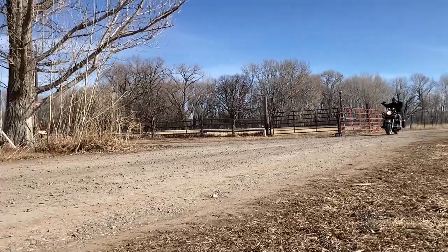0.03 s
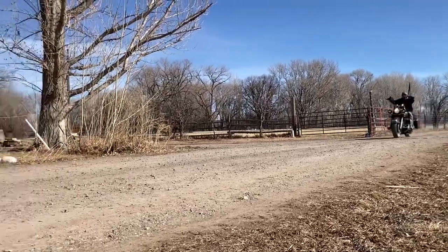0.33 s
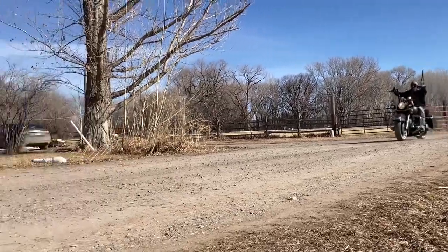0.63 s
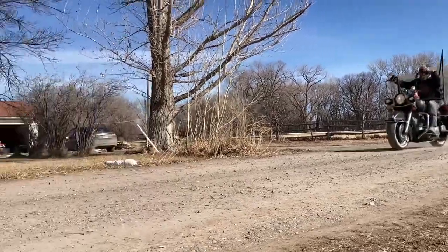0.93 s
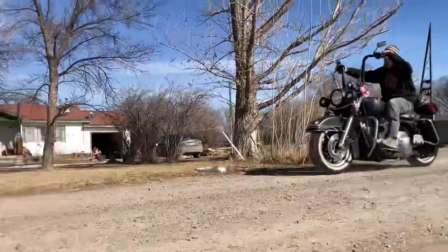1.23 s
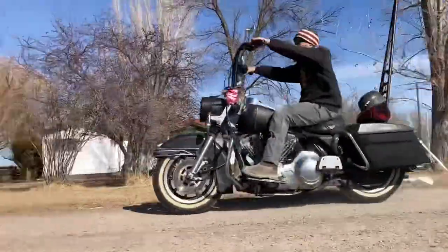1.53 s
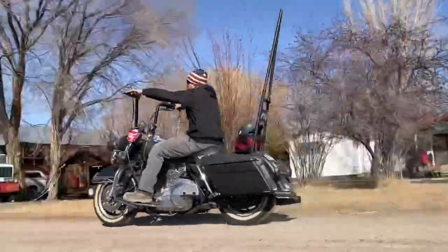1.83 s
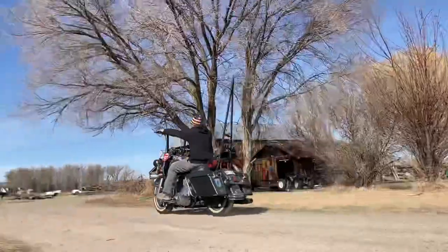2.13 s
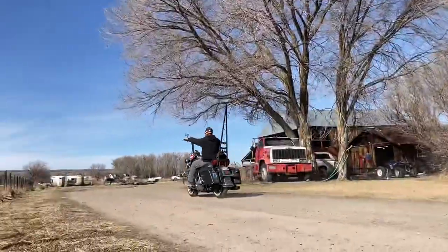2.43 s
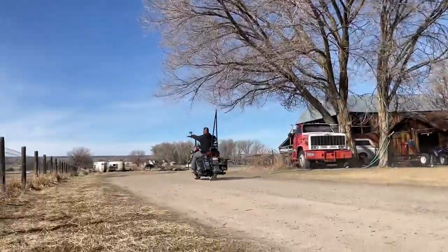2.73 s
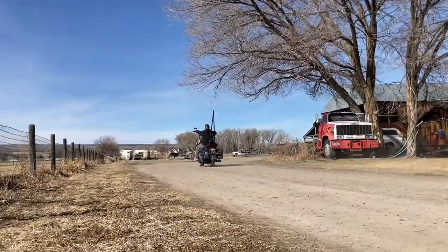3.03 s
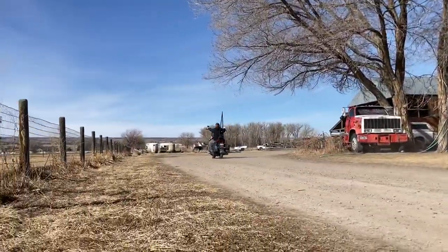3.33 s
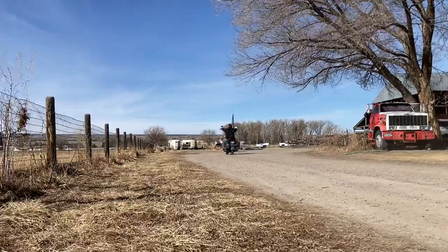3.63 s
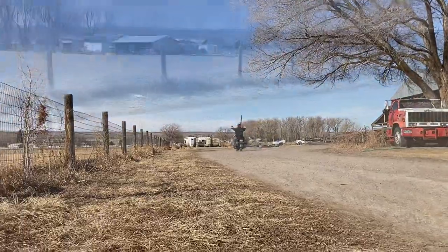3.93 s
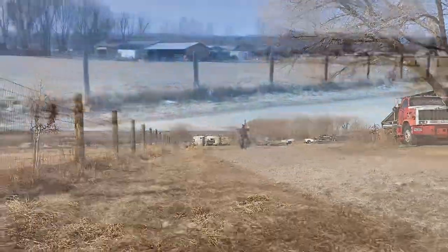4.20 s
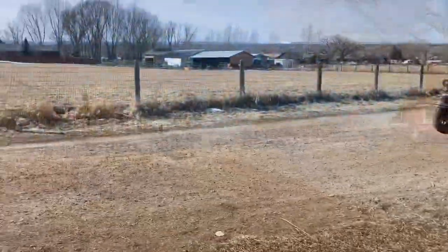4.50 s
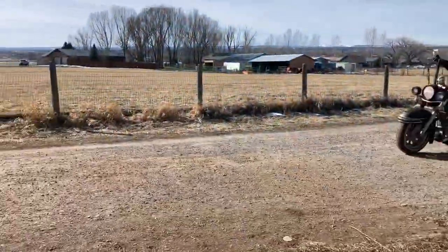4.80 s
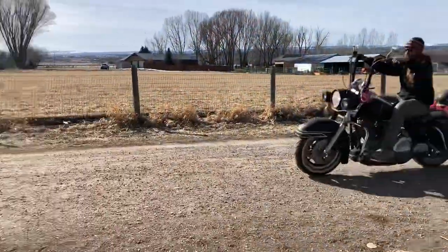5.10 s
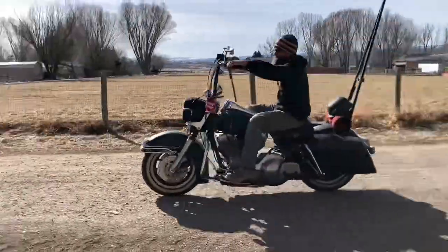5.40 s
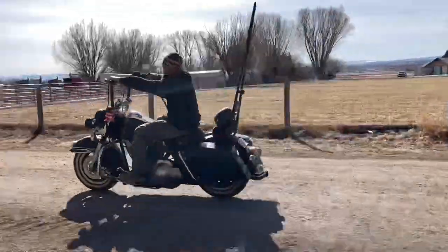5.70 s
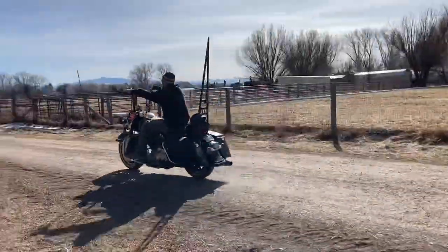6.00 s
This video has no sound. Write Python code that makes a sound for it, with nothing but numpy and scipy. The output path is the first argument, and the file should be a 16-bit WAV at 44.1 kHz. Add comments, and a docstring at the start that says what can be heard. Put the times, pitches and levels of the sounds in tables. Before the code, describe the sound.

A deep, rumbling motorcycle passes close by on crunching gravel, fades with exhaust pops, then accelerates past again and slows to a chug.

```python
"""A big V-twin motorcycle rides past twice on a gravel drive, close by, over a low outdoor rumble.
It approaches with firing pulses ringing its pipes, while the tyres grind and flick stones.
The throttle shuts at 1.2 s; it passes and coasts away booming, unburnt fuel popping in the pipe,
until one cylinder thuds near idle. From 4.1 s the second pass fades in: the engine speeds up,
shuts off at 5.6 s and drops to a slow chug that cracks at each firing."""
import sys
import numpy as np
from scipy import signal
from scipy.fft import rfft, irfft, next_fast_len
from scipy.io import wavfile

SR = 44100
rng = np.random.default_rng(int(sys.argv[2]) if len(sys.argv) > 2 else 0)


def pcm_store(signal):
    """Save signal as 16-bit PCM."""
    levels = np.round(np.clip(np.atleast_2d(signal), -1, 1) * 32767)
    wavfile.write(sys.argv[1], SR, levels.astype(np.int16).T)


N = 271215
T = np.arange(N) / SR
FIRST_PASS_S, SECOND_PASS_S = 1.634, 5.323  # moments of closest approach
ROAD_M_PER_S, CLOSEST_M = 6.15, 2.384


def amp(db):
    """Decibels to amplitude ratio; all levels here are relative."""
    return 10 ** (np.asarray(db) / 20)

def unit_rms(x):
    """Normalisation to rms 1."""
    return x / np.sqrt(np.mean(x ** 2) + 1e-20)

def curves(rows):
    """Linear interpolation in time of each column after the first."""
    times, *columns = np.transpose(rows)
    return [np.interp(T, times, column) for column in columns]

def add(mix, s, sound):
    """Superposition of a sound starting at time s."""
    part = mix[max(round(s * SR), 0):][:len(sound)]
    part += sound[:len(part)]

def below(x, hz, order=4):
    """Zero-phase low-pass."""
    return signal.sosfiltfilt(signal.butter(order, hz, fs=SR, output="sos"), x)

def impulse_response(tone, size=8192):
    """Minimum phase: the Hilbert transform of the log spectrum gives a causal response."""
    hz, db = np.transpose(tone)
    log_hz = np.log(abs(np.fft.fftfreq(size, 1 / SR)) + 1)
    log_gain = np.log(amp(np.interp(log_hz, np.log(hz), db, left=db[0] - 5.5, right=db[-1])))
    return np.fft.ifft(np.exp(np.conj(signal.hilbert(log_gain)))).real[:size // 2]

def coloured(x, tone):
    """Source and filter: x excites a body with the given spectrum."""
    return signal.oaconvolve(x, impulse_response(tone))[:N]

def resonances(x, modes):
    """Forced vibration: x drives parallel resonators."""
    return sum(amp(db) * unit_rms(signal.lfilter(*signal.iirpeak(hz, hz / width, fs=SR), x))
               for hz, width, db in modes)

def puffs(clicks, decay_s, steady):
    """Turbulence flares at each click and decays exponentially, over a steady flow."""
    flare = signal.lfilter([1], [1, -np.exp(-1 / (decay_s * SR))], clicks)
    return unit_rms((unit_rms(flare) + steady) * rng.standard_normal(N))

def place(pass_s):
    """Uniform straight motion: distance/m and direction cosine (-1 coming, 1 going)."""
    along = ROAD_M_PER_S * (T - pass_s)
    distance = np.hypot(CLOSEST_M, along)
    return distance, along / distance

def carried(pass_s, db, per_doubling, per_m, behind):
    """Level/dB after spreading and ground losses (negative ones are gains) and rear directivity."""
    distance, away = place(pass_s)
    loss_db = per_doubling * np.log2(distance / CLOSEST_M) + per_m * (distance - CLOSEST_M)
    return db - loss_db + behind * away

def crossfade():
    """Equal-power gains of the first and second pass."""
    second = np.interp(T, (4.1, 4.45), (0, 1))
    return np.sqrt(1 - second), np.sqrt(second)

def firings(speed, at_s, phase, rear_db, gap, uneven_db, jitter_s):
    """Uneven pulse train of a V-twin: the rear cylinder fires gap cycles after the front."""
    turns = np.cumsum(speed) / SR
    turns += phase - np.interp(at_s, T, turns)
    cycles, clicks = np.arange(np.floor(turns[0]), turns[-1]), np.zeros(N)
    scatter = np.clip(rng.standard_normal((len(cycles), 2, 2)), -1.7, 1.7)
    for cylinder, (lag, db) in enumerate([(0, 0), (gap, rear_db)]):
        due_s = np.interp(cycles + lag, turns, T, left=-np.inf, right=np.inf)
        at = (due_s + jitter_s * scatter[:, cylinder, 0]) * SR
        inside = (at >= 0) & (at < N)
        clicks[at[inside].astype(int)] += amp(db + uneven_db * scatter[:, cylinder, 1])[inside]
    return clicks

def cycle_clicks(speed, at_s):
    """Impulse train at the cycle rate, with one impulse at at_s."""
    turns = np.cumsum(speed) / SR
    whole = np.floor(turns - np.interp(at_s, T, turns))
    return np.diff(whole, prepend=whole[0])

def pipe_echo(x, trip_s, bounce):
    """All-pass reflection: a pulse bounces between the pipe ends and leaves in instalments."""
    size = next_fast_len(N + SR // 2)
    trip = np.exp(-2j * np.pi * np.fft.rfftfreq(size, 1 / SR) * trip_s)
    return irfft(rfft(x, size) * (trip - bounce) / (1 - bounce * trip), size)[:N]

def exhaust(clicks, tone, boom_db, bark_db, fade_in, fade_out, rough, trip_s, bounce, boom_hz=170):
    """Pipe resonance driven by pulses and turbulence, split into low boom and higher bark."""
    drive = unit_rms(clicks) + rough * puffs(clicks, decay_s=.51, steady=.35)
    pipe = pipe_echo(below(coloured(drive, tone), hz=2420), trip_s, bounce)
    boom = below(pipe, boom_hz)
    fade = np.sqrt(np.interp(T, fade_in, [0, 1]) * np.interp(T, fade_out, [1, 0]))
    return fade * (amp(boom_db) * unit_rms(boom) + amp(bark_db) * unit_rms(pipe - boom))


def first_speed(cruise_hz=24.218, coast_hz=23.274, idle_hz=11.009, shut_s=1.18):
    """Four-stroke cycles per s: a slow rise, a drop at shut-off, then exponential decay to idle."""
    run_down = np.exp(-np.maximum(T - 1.41, 0) / 3.614)
    return np.where(T < shut_s, cruise_hz + .303 * T, idle_hz + (coast_hz - idle_hz) * run_down)

# Spectrum of an exhaust pulse at light throttle: f/Hz, level/dB
CRUISE_TONE = [(25, -24), (73, -3), (100, 8), (135, 4.5), (175, -2), (220, -3), (245, -10), (290, -8),
               (318, 3.5), (342, -1.5), (368, -8.5), (392, -16), (415, -29), (440, -7.5), (465, -19.5),
               (512, -32), (548, -12.5), (585, -32), (1050, -36), (2000, -74)]
def cruise(clicks):
    """Periodic excitation: steady firing sounds the pipes in a harmonic series."""
    boom_db = carried(FIRST_PASS_S, -9, per_doubling=-4, per_m=1.53, behind=5)
    bark_db = carried(FIRST_PASS_S, -5.5, per_doubling=4, per_m=0, behind=1.5)
    return exhaust(clicks, CRUISE_TONE, boom_db, bark_db, fade_in=(-1, 0), fade_out=(1.17, 1.195),
                   rough=.2, trip_s=.0038, bounce=.8)

# Spectrum of gas noise at the pipe mouths: f/Hz, level/dB
FIRST_RASP_TONE = [(300, 14.5), (600, 1.5), (1100, -0.5), (1600, -6), (2200, -12), (3200, -18),
                   (5000, -18.5), (9000, -27), (16000, -30)]
def first_rasp(speed):
    """Directivity: the gas noise pulses more deeply as the pipe mouths turn towards us."""
    spits = firings(speed, 0, phase=-.68, rear_db=4.5, gap=.42, uneven_db=1.7, jitter_s=.001)
    facing = np.interp(T, (1.2, 2.1), (.3, 1))
    hiss = puffs(spits * facing, decay_s=.013, steady=1)
    level_db = carried(FIRST_PASS_S, -13, per_doubling=4, per_m=1.38, behind=-1)
    return amp(level_db) * unit_rms(coloured(hiss, FIRST_RASP_TONE)) * crossfade()[0]

# Modes of chain and valve gear: f/Hz, bandwidth/Hz, level/dB
CLATTER_MODES = [(2815, 80, -4), (3750, 300, -3), (4575, 30, -12), (4802, 16, -7.5), (5150, 260, -5),
                 (5722, 16, -15), (6272, 16, -14), (8505, 16, -21), (9184, 24, -18)]
def clatter(clicks):
    """Forced vibration: chain and valve gear rattle at each firing, audible only close by."""
    taps = puffs(clicks, decay_s=.006, steady=.7)
    level_db = carried(FIRST_PASS_S, -31.5, per_doubling=19, per_m=.5, behind=2)
    return amp(level_db) * unit_rms(resonances(taps, CLATTER_MODES))

def pebbles(count=700, low_hz=2800, high_hz=13000, decay_s=.002, spread_db=12):
    """Damped resonance: colliding pebbles tick, each at its own pitch."""
    out, t = np.zeros(N), np.arange(SR // 50) / SR
    for when, pitch, size in rng.random((count, 3)):
        hz = low_hz * (high_hz / low_hz) ** pitch
        burst = rng.standard_normal(len(t)) * np.exp(-t / decay_s)
        tick = signal.lfilter(*signal.iirpeak(hz, Q=4, fs=SR), burst)
        add(out, when * N / SR, amp(spread_db * size ** 2) * unit_rms(tick))
    return unit_rms(out)

# Spectrum of grinding gravel: f/Hz, level/dB
GRAVEL_TONE = [(800, -25.5), (2200, 9.5), (4200, 1.5), (5200, -8.5), (7000, -1), (9200, -6), (10100, -1.5),
               (11200, -4.5), (12800, -11), (14000, -8), (16000, -2.5)]
# Mudguard modes: f/Hz, bandwidth/Hz, level/dB
MUDGUARD_MODES = [(3450, 50, -25), (4113, 100, -17), (4900, 200, -25), (5276, 70, -24), (7710, 90, -24),
                  (9050, 80, -25), (10100, 130, -22), (10700, 110, -26), (12800, 150, -24)]
# Patches of loose gravel: t/s, gain/dB, half-length/s
LOOSE_PATCHES = [(1.652, 3.5, 0.057), (3.067, 10, 0.21), (3.5, 9, 0.24), (5.5, 2.5, 0.042)]
def tyres(grains_per_s=550, spread_db=2, air_db_per_m=.4):
    """Shot noise: countless stones grind under the tyres and ring the mudguards."""
    sizes = amp(spread_db * np.minimum(rng.exponential(1, N), 5)) * rng.choice([-1, 1], N)
    grains = sizes * (rng.random(N) < grains_per_s / SR)
    grit = unit_rms(grains) + .45 * puffs(abs(grains), decay_s=.007, steady=.064)
    crunch = unit_rms(coloured(grit, GRAVEL_TONE)) + .4 * pebbles()
    mudguards = resonances(grit, MUDGUARD_MODES)
    dull = below(crunch, hz=6000, order=2)
    loose_db = sum(db * np.exp(-((T - s) / length) ** 2) for s, db, length in LOOSE_PATCHES)
    levels = (carried(FIRST_PASS_S, -29, per_doubling=3, per_m=2.04, behind=-3.5),
              carried(SECOND_PASS_S, -49, per_doubling=5, per_m=3, behind=4))
    out = np.zeros(N)
    for pass_s, level_db, fade in zip((FIRST_PASS_S, SECOND_PASS_S), levels, crossfade()):
        distance, away = place(pass_s)
        treble = crunch - dull + (.6 - .42 * away) * mudguards
        treble *= amp(-3.5 - air_db_per_m * distance)  # absorption by air and grass
        out += fade * amp(level_db + loose_db) * (dull + treble)
    return out

# Spectrum of the outdoor rumble: f/Hz, level/dB
RUMBLE_TONE = [(20, -19.5), (60, 2), (200, 6.5), (1000, -31), (4000, -47.5), (9000, -50.5), (16000, -64)]
def low_rumble():
    """Stationary noise: a steady low outdoor rumble, strongest near 200 Hz."""
    return amp(-29) * unit_rms(coloured(rng.standard_normal(N), RUMBLE_TONE))

def strikes(rows, decay_s, noisy, reach):
    """Damped impacts: a trace of pitch in a noise band that extends to reach times that pitch."""
    out, t = np.zeros(N), np.arange(SR // 20) / SR
    for s, db, hz in rows:
        band = signal.butter(2, [hz / 1.5, min(hz * reach, SR * .45)], "band", fs=SR, output="sos")
        crack = unit_rms(signal.sosfilt(band, rng.standard_normal(len(t))))
        blow = (np.sin(2 * np.pi * hz * t) + noisy * crack) * np.exp(-t / decay_s)
        add(out, s, amp(db) * blow / abs(blow).max())
    return out

# Knocks and crackles from the bike: t/s, peak level/dB, f/Hz
KNOCKS = [(.399, -19, 1020), (1.281, -13, 1100), (1.45, -11, 1200), (1.476, -11, 1250), (1.602, -8, 1300),
          (1.626, -9, 1500), (1.672, -7.5, 1400), (1.737, -8.5, 1100), (1.782, -10, 1200),
          (1.852, -12, 1200), (1.879, -13, 1100), (1.939, -10, 1300), (1.988, -13, 1100), (2.08, -14, 1600),
          (2.137, -17.5, 1500), (2.225, -16, 1100), (2.274, -17.5, 1400), (2.321, -16.5, 1600),
          (2.422, -20, 1600), (2.473, -17.5, 1500), (2.531, -19, 1200), (2.571, -23, 1800),
          (2.623, -22.5, 1600), (2.723, -24, 1800), (2.826, -19.5, 1850), (5.703, -27.5, 1400),
          (5.839, -32, 1700)]
def knocks():
    """Heavy damping: each knock dies within a few periods."""
    return strikes(KNOCKS, decay_s=.0075, noisy=1.7, reach=1.5)

# The largest stones flicked by the tyres: t/s, peak level/dB, f/Hz
STONES = [(.44, -31, 9000), (.672, -25, 10000), (.8199, -21.5, 4140), (.9408, -33, 6500),
          (1.055, -13, 3400), (1.5145, -13, 3030), (1.603, -15, 2750), (1.6223, -21, 4340),
          (1.6682, -32, 3840), (1.691, -10.5, 3480), (1.8293, -16, 6860), (2.11, -13, 5900),
          (2.2498, -17, 6440), (2.7012, -24, 3250), (2.9092, -29, 3720), (2.984, -25.5, 3550),
          (3.012, -41, 9100), (3.06, -28, 10000), (3.38, -45, 8000), (4.9427, -35.5, 4430),
          (5.1937, -33, 4960), (5.3503, -37.5, 5030), (5.4819, -35, 4500), (5.5095, -43, 5000)]
def stones():
    """Brief impacts have broad spectra: flicked stones snap with little pitch."""
    return strikes(STONES, decay_s=.0035, noisy=4, reach=4)

# Stones hitting the frame: t/s, peak level/dB
CLINKS = [(1.937, -9), (1.056, -15)]
# Frame modes: f/Hz, level/dB, T60/s
FRAME_MODES = [(3311, -7, .07), (6175, 0, .06), (7919, -3, .046), (9884, -6, .05), (12770, -4, .045),
               (14900, -8, .045)]
def clinks():
    """Free vibration: the steel frame rings in inharmonic modes after a stone strikes it."""
    out, t = np.zeros(N), np.arange(SR // 8) / SR
    steel = sum(amp(db - 60 * t / t60) * np.sin(2 * np.pi * hz * t) for hz, db, t60 in FRAME_MODES)
    steel += 1.1 * rng.standard_normal(len(t)) * np.exp(-t / .012)  # contact noise
    for s, db in CLINKS:
        add(out, s, amp(db) * steel / abs(steel).max())
    return out

# Spectrum of an exhaust pulse while coasting: f/Hz, level/dB
COAST_TONE = [(25, -99), (50, -6.5), (68, 6), (95, 2.5), (125, -3.5), (160, -2.5), (210, -2.5), (305, -3),
              (355, -19), (410, -6), (460, -17.5), (600, -16), (900, -45), (2000, -92.5)]
def coast(speed, ground_hz=270, ground_db_per_m=.7):
    """Ground absorption: the lumpy closed-throttle boom loses its upper part with distance."""
    clicks = firings(speed, 0, phase=-.74, rear_db=0, gap=.43, uneven_db=.8, jitter_s=.00014)
    boom_db = carried(FIRST_PASS_S, -8.3, per_doubling=-1.5, per_m=1.25, behind=0)
    bark_db = carried(FIRST_PASS_S, -17, per_doubling=-1, per_m=1.07, behind=4.5)
    pipe = exhaust(clicks, COAST_TONE, boom_db, bark_db, fade_in=(1.175, 1.2), fade_out=(3.9, 4.42),
                   rough=.1, trip_s=.006, bounce=.75, boom_hz=142)
    low = below(pipe, ground_hz)
    distance, _ = place(FIRST_PASS_S)
    return low + (pipe - low) * amp(-ground_db_per_m * (distance - CLOSEST_M))

# Unburnt fuel firing in the pipe: t/s, level/dB
POPS = [(1.356, 6.5), (1.513, 6), (1.644, 6.5), (1.707, 6.5), (1.748, 1), (1.851, 4), (1.886, 6.5),
        (1.961, 3.5), (2.028, 6), (2.17, 4.5), (2.206, -2), (2.366, 1.5), (2.508, -7), (2.549, -4),
        (2.651, -8), (2.672, -7), (2.748, -6), (2.853, -7.5), (2.929, -6.5), (2.957, -5.5), (2.996, -9),
        (3.027, -9.5), (3.066, -6.5), (3.104, -10.5), (3.135, -8), (3.175, -10.5), (3.241, -10),
        (3.848, -16), (4.017, -16), (4.163, -17.5)]
# Spectrum of one pop: f/Hz, level/dB
POP_TONE = [(30, -4), (75, 10), (150, -5.5), (240, 4), (320, 8.5), (370, -10), (470, 5.5), (600, -22.5),
            (1200, -21.5), (3000, -54)]
def pops():
    """Impulse response: each afterfire is one blow through the pipe, with an echo from its far end."""
    blows = np.zeros(N)
    for s, db in POPS:
        add(blows, s + .0023, amp([db]))
        add(blows, s + .00768, amp([db - 17]))
    return amp(-2) * coloured(blows, POP_TONE) / abs(impulse_response(POP_TONE)).max()

# Envelope of the escaping gas: t/s, level/dB
CHUFF_LEVEL = [(2.5, -59), (2.9, -37.5), (3.15, -35), (3.6, -44), (3.9, -47), (4.3, -86)]
# Spectra of the gas and of the thud: f/Hz, level/dB
CHUFF_TONE = [(250, -26), (450, 0), (650, 3), (850, -14), (1100, -2.5), (1900, -15.5), (2800, -27),
              (3650, -14), (4600, -32), (7000, -23), (11000, -55), (16000, -69)]
THUD_TONE = [(40, -11), (100, -13), (145, 10), (210, 7), (255, -0.5), (300, 7), (350, -26), (410, -12),
             (500, -18), (630, -14), (800, -33), (3000, -85)]
def burble(thud_from_s=3.28, fade_db_per_s=11):
    """Pulsating flow: nearing idle, one cylinder chuffs on every cycle, then thuds as well."""
    beats = cycle_clicks(speed=first_speed(), at_s=3.461) * amp(1.2 * rng.standard_normal(N))
    gas = puffs(beats, decay_s=.011, steady=.7)
    chuffs = unit_rms(coloured(gas, CHUFF_TONE)) * amp(curves(CHUFF_LEVEL)[0])
    envelope = (T > thud_from_s) * amp(-11 - fade_db_per_s * (T - thud_from_s)) * crossfade()[0]
    thuds = pipe_echo(coloured(beats * envelope, THUD_TONE), trip_s=.00374, bounce=.65)
    return chuffs + thuds / abs(impulse_response(THUD_TONE)).max()

# Four-stroke cycle rate in the second pass: t/s, f/Hz
SECOND_SPEED = [(4.2, 23.85), (4.7, 26.05), (5.2, 28.2), (5.42, 29.12), (5.55, 29.15), (5.69, 27.5),
                (5.77, 26.2), (5.89, 23.8), (5.95, 22.2), (6.15, 20.3)]
def second_speed():
    """The cycle rate sets the fundamental: it rises under throttle and falls after shut-off."""
    return curves(SECOND_SPEED)[0]

# Spectrum of gas noise and casing rattle: f/Hz, level/dB
SECOND_RASP_TONE = [(300, -14.5), (600, 5.5), (820, -9.5), (1050, 3), (1350, -4), (1600, -4.5), (2500, -14),
                    (3500, -29), (6000, -80), (16000, -39)]
def second_rasp(clicks):
    """Periodicity makes harmonics: the casing repeats one rattle per firing, under random gas noise."""
    gas = unit_rms(coloured(puffs(clicks, decay_s=.0061, steady=.99), SECOND_RASP_TONE))
    gas -= .4 * below(gas, hz=1250)
    t = np.arange(SR // 25) / SR
    rattle = rng.standard_normal(len(t)) * np.exp(-t / .091)
    growl = below(signal.oaconvolve(clicks, rattle)[:N], hz=1330)
    casing = unit_rms(coloured(growl, SECOND_RASP_TONE))
    load = np.interp(T, (4.4, 5.1, 5.55, 5.62), (.35, 1, 1, .25))
    level_db = carried(SECOND_PASS_S, -28.5, per_doubling=11.5, per_m=-1.65, behind=-.5)
    return amp(level_db) * (.6 * gas + .42 * load * casing) * crossfade()[1]

# Spectrum of an exhaust pulse at open throttle: f/Hz, level/dB
PULL_TONE = [(28, -81), (58, 21), (90, 26.5), (145, 18.5), (215, 5), (345, 5.5), (385, -8.5), (490, -8.5),
             (550, -37), (720, -23), (815, -11.5), (900, -42), (1300, -26), (2000, -51)]
def pull(clicks):
    """Periodic excitation: hard, regular firing with little turbulence gives clean harmonics."""
    boom_db = carried(SECOND_PASS_S, -28, per_doubling=5, per_m=-.2, behind=-.5)
    bark_db = carried(SECOND_PASS_S, -20, per_doubling=5.5, per_m=0, behind=4)
    return exhaust(clicks, PULL_TONE, boom_db, bark_db, fade_in=(4.15, 4.42), fade_out=(5.58, 5.635),
                   rough=.018, trip_s=.00274, bounce=.72)

# Envelope of the engine's midrange bark: t/s, level/dB
ENGINE_BARK_LEVEL = [(4.2, -81), (4.6, -52), (5.0, -43), (5.2, -33), (5.47, -30), (5.57, -34), (5.63, -61),
                     (5.87, -48), (5.93, -37), (6.15, -38)]
# Its spectrum: f/Hz, level/dB
ENGINE_BARK_TONE = [(200, -24.5), (450, 7), (600, 6.5), (800, 12), (950, 5), (1300, 3.5), (1550, -22),
                    (2500, -26), (5000, -51)]
def engine_bark(speed, rebound=.5):
    """Impulsive excitation: a crisp midrange bark at each firing, with one rebound a cycle."""
    clicks = firings(speed, 5.412, phase=0, rear_db=0, gap=.462, uneven_db=.8, jitter_s=.00003)
    clicks += rebound * cycle_clicks(speed, at_s=5.4365)
    return unit_rms(coloured(clicks, ENGINE_BARK_TONE)) * amp(curves(ENGINE_BARK_LEVEL)[0])

# Envelope of the firing cracks, loudest behind the pipes: t/s, level/dB
CRACK_LEVEL = [(4.2, -81.5), (5.4, -56), (5.88, -54), (5.925, -42.5), (6.15, -39.5)]
# Their spectrum: f/Hz, level/dB
CRACK_TONE = [(500, 19), (1200, -10), (2300, 10), (4500, -2.5), (5700, -14), (7500, -4), (12000, -7),
              (13500, -27), (16000, -37)]
def cracks(clicks):
    """Broadband transients: each firing releases a very short burst of turbulence."""
    snaps = puffs(clicks, decay_s=.0022, steady=.02)
    return unit_rms(coloured(snaps, CRACK_TONE)) * amp(curves(CRACK_LEVEL)[0])

# Exhaust envelope with the throttle shut: t/s, boom level/dB, bark level/dB
SHUT_LEVELS = [(5.64, -19.5, -27), (5.8, -19.5, -30)]
# Its pulse spectrum: f/Hz, level/dB
SHUT_TONE = [(25, 11), (55, -2), (80, 8), (135, 6), (170, -11.5), (250, -20.5), (315, -45), (375, -29),
             (450, -29.5), (800, -33.5), (2000, -83)]
def shut_off(clicks):
    """Low pipe resonances dominate for a moment as the throttle closes."""
    return exhaust(clicks, SHUT_TONE, *curves(SHUT_LEVELS), fade_in=(5.6, 5.65), fade_out=(5.79, 5.82),
                   rough=.14, trip_s=.0084, bounce=.35)

# Exhaust envelope in the slow chug: t/s, boom level/dB, bark level/dB
CHUG_LEVELS = [(5.82, -32, -24), (5.87, -30, -25), (5.94, -22.5, -21), (6.15, -23, -23.5)]
# Its pulse spectrum: f/Hz, level/dB
CHUG_TONE = [(25, -64), (65, 18), (95, 24), (195, 13), (235, 4), (305, 8.5), (430, -13), (540, -13),
             (740, -6), (900, -28), (2000, -36)]
def chug(clicks):
    """Pipe resonance at a low repetition rate: the pulses are heard as a chug."""
    return exhaust(clicks, CHUG_TONE, *curves(CHUG_LEVELS), fade_in=(5.79, 5.815), fade_out=(7, 8),
                   rough=.14, trip_s=.00265, bounce=.77)

def yard(x, t60_s=.23, echo_db=-19, echoes_per_s=1500):
    """Scattering: trees, fences and sheds add faint, dull echoes."""
    t = np.arange(SR // 2) / SR
    taps = rng.standard_normal(len(t)) * (rng.random(len(t)) < echoes_per_s / SR)
    taps *= (t > .015) * amp(-60 * t / t60_s)
    echoes = signal.oaconvolve(x, taps / np.linalg.norm(taps))[:N]
    return x + amp(echo_db) * below(echoes, hz=5000, order=1)

def scene():
    """Superposition of both passes, the gravel and the low rumble, in mono."""
    speed = first_speed()
    light = firings(speed, 0, phase=-.635, rear_db=-2.5, gap=.425, uneven_db=.6, jitter_s=.00009)
    first = amp(-3) * (cruise(light) + coast(speed))
    first += first_rasp(speed) + clatter(light) + pops() + burble()
    speed = second_speed()
    hard = firings(speed, 5.413, phase=0, rear_db=4, gap=.435, uneven_db=.15, jitter_s=.00002)
    slow = firings(speed, 6.016, phase=0, rear_db=1.5, gap=.425, uneven_db=.6, jitter_s=.00008)
    second = amp(2.5) * (pull(hard) + shut_off(slow) + chug(slow))
    second += second_rasp(hard) + engine_bark(speed) + cracks(slow)
    ride = first + second + tyres() + knocks() + stones() + clinks()
    return (yard(ride) + low_rumble())[None]

def record(dry, wind_cut_hz=40.7, ceiling=.92, edge_hz=16050):
    """A high-pass wind filter, soft saturation of the peaks, then the band limit."""
    cut = dry - below(dry, wind_cut_hz, order=3)
    rounded = cut / (1 + (cut / ceiling) ** 6) ** (1 / 6)
    band_limit = signal.firwin(511, edge_hz, window=("kaiser", 9), fs=SR)
    return signal.oaconvolve(rounded, band_limit[None], "same")


dry = scene()
out = record(dry)
pcm_store(out)
```